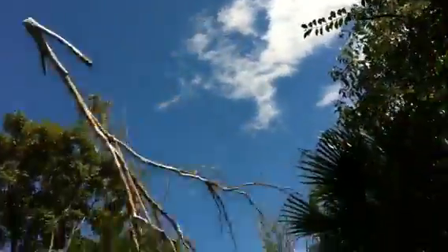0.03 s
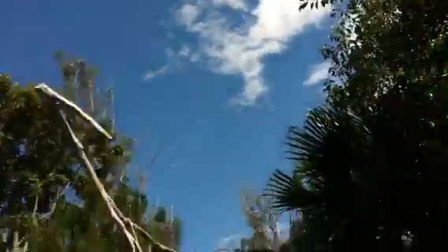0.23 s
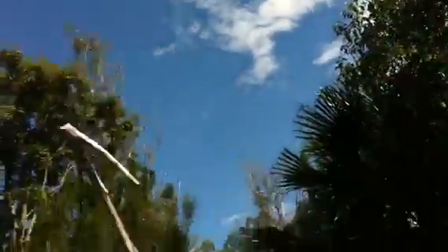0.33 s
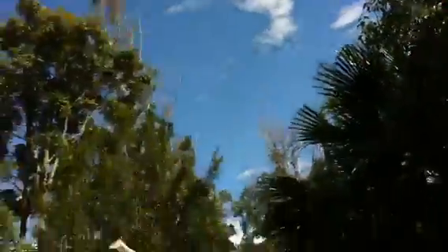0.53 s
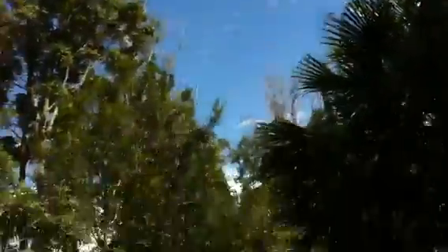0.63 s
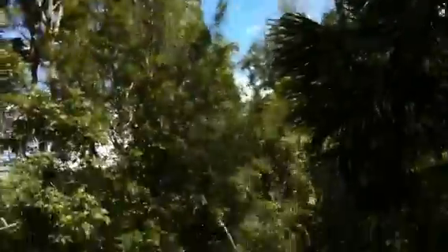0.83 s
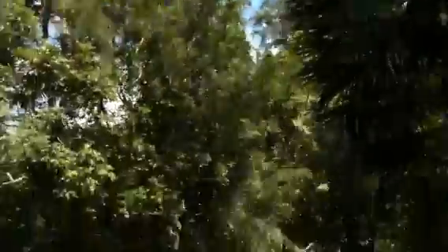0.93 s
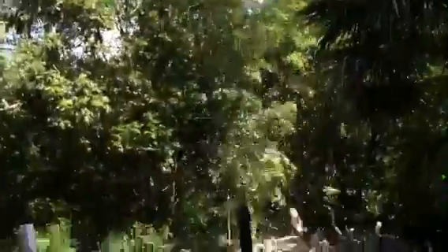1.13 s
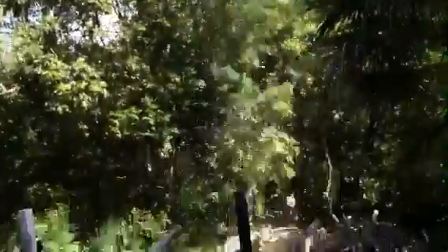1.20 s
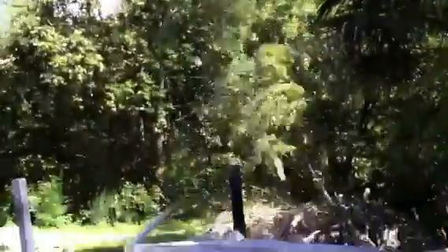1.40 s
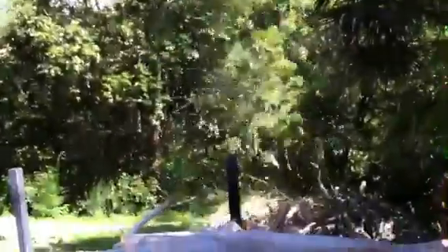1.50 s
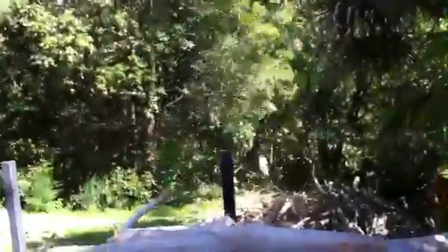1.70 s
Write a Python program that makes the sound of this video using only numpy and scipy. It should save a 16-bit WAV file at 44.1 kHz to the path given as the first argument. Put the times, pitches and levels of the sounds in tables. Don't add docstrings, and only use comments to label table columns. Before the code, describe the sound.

A dead tree falls close by in open bush: faint leaf rustle, then sharp snaps and dense crackling swell, ending in a double heavy thud and quickly settling debris, caught on a phone with slightly squeezed peaks.

```python
import sys
import numpy as np
from scipy import signal
from scipy.fft import rfft, irfft
from scipy.io import wavfile
from scipy.ndimage import uniform_filter1d

SR = 44100
rng = np.random.default_rng(int(sys.argv[2]) if len(sys.argv) > 2 else 0)


def nominal_scale(level):
    x = np.asarray(level, float) / 20
    return 10 ** x


def master_out(mix):
    frames = np.transpose(np.atleast_2d(mix))
    ceiling = np.clip(frames, -1, 1)
    pcm = np.round(ceiling * 32767).astype(np.int16)
    wavfile.write(sys.argv[1], SR, pcm)


N = 77175
BURST_N = 8192
LEAF_PER_S, LEAF_SCATTER_DB = 16000, 3
BREAK_PER_S, BREAK_SCATTER_DB = 5000, 3.5


def unit(x):
    return x / np.sqrt(np.mean(x ** 2) + 1e-20)


def band(x, hz, share):
    q = 1 / np.clip(share, .05, 1.5)
    return signal.lfilter(*signal.iirpeak(min(hz, .4 * SR), q, fs=SR), x)


def colour(x, points):
    corner_hz, corner_db = np.transpose(points)
    f = np.maximum(np.arange(1025) * SR / 2048, 1)
    shape_db = np.interp(np.log(f), np.log(corner_hz), corner_db)
    cepstrum = irfft(shape_db * np.log(10) / 20)
    cepstrum[1:1024] *= 2
    cepstrum[1025:] = 0
    response = irfft(np.exp(rfft(cepstrum)))
    return unit(signal.fftconvolve(x, response)[:len(x)])


def ticks(size, per_s, scatter_db):
    chance, side, strength = rng.random((size, 3)).T
    struck = chance < per_s / SR
    excess = np.minimum(-np.log(1 - strength), 2.2)
    return unit(struck * np.sign(side - .5) * nominal_scale(scatter_db * excess))


def walk(rate):
    k = int(SR / rate)
    w = rng.standard_normal(N)
    return unit(uniform_filter1d(uniform_filter1d(w, k), k))


def shaped(x, length, release):
    t = np.arange(BURST_N) / SR
    attack = np.minimum(t / 0.0022, 1)
    sag = nominal_scale(-2 * np.minimum(t / length, 1))
    env = attack * sag * np.exp(-np.maximum(t - length, 0) / release)
    return env * x * np.sqrt(np.sum(env ** 2) / np.sum((env * x) ** 2))


def add(out, s, x):
    i = int(s * SR)
    out[i:i + len(x)] += x[:N - i]


# (frequency [Hz], density [dB per Hz])
BUSH_SPECTRUM = [(35, -7), (110, -19), (283, -1.5), (1850, -11.5), (2820, -11.5), (3570, -8.5), (7930, -21),
                 (15300, -20), (16400, -27)]


def bush():
    return colour(rng.standard_normal(N), BUSH_SPECTRUM) * nominal_scale(-52 + 0.24 * walk(5.4))


def echo(fall):
    t60_s, start_s, level_db = 0.65, 0.01, -15.5
    t = np.arange(SR) / SR
    tail = rng.standard_normal(SR) * nominal_scale(-60 * t / t60_s) * np.clip(t / start_s, 0, 1)
    tail = signal.lfilter(*signal.butter(1, [300, 5350], "band", fs=SR), tail)
    tail = tail / np.sqrt(np.sum(tail ** 2))
    return nominal_scale(level_db) * signal.fftconvolve(fall, tail)[:N]


# (time [s], level [dB])
SOIL = [(0, -63), (.45, -56), (.7, -58), (.95, -39), (1.12, -28), (1.25, -43.5), (1.5, -54), (1.75, -56)]


def rumble():
    time, level = np.transpose(SOIL)
    x = unit(band(band(rng.standard_normal(N), 102, 1.0), 102, 1.0))
    return x * nominal_scale(np.interp(np.arange(N) / SR, time, level) + 2.3 * walk(14))


# (centre time [s], half length [s], gain change [dB])
LULLS = [(1.047, 0.0058, -1.5), (0.96, 0.0046, -3), (.812, 0.0058, -1.5), (.947, 0.0058, -3),
         (.897, 0.0034, -2), (0.75, .008, 0), (.557, .003, -2), (1.9, .015, 1), (1.51, 0.035, -3)]


def lull():
    t = np.arange(N) / SR
    return nominal_scale(sum(db * np.exp(-.5 * ((t - s) / half) ** 2) for s, half, db in LULLS))


# (time [s], level [dB], share of heavier wood [dB])
RAKE = [(0.0, -44.5, -7), (0.048, -44.5, -17), (0.062, -32, -41), (0.106, -27, -9.5), (0.184, -38.5, -15),
        (0.224, -32.5, -33), (0.268, -32.5, -8.5), (0.408, -24.5, -15.5), (0.536, -25, 0), (0.55, -25, -10),
        (0.648, -25.5, -9), (0.74, -19.5, -0.5), (0.788, -24, 4.5), (0.866, -22, 2.5), (1.038, -33.5, 5),
        (1.12, -32, 7.5), (1.276, -42.5, -0.5), (1.75, -48.5, -1.5)]
# (frequency [Hz], density [dB per Hz])
LEAVES = [(59, -35), (100, -44), (186, -2.5), (744, -5), (2210, 0), (2850, -3), (9030, 2), (15400, -5),
          (16400, -63)]
# (frequency [Hz], density [dB per Hz])
WOOD = [(35, -59), (60, -36), (237, -3), (299, -6), (815, -4), (1050, -3.5), (6790, -17.5), (9190, -21.5),
        (15700, -32)]


def crown():
    t = np.arange(N) / SR
    time, level, wood_share = np.transpose(RAKE)
    leaves = colour(ticks(N, LEAF_PER_S, LEAF_SCATTER_DB), LEAVES)
    dull = signal.lfilter(*signal.butter(2, 7200, fs=SR), leaves)
    leaves = sum(part * nominal_scale(0.6 * walk(34)) for part in (dull, leaves - dull))
    flicker_db = 2.2 * np.interp(t, (1.2, 1.4), (1, .2)) * walk(60)
    wood = colour(ticks(N, 6000, 2), WOOD) * nominal_scale(flicker_db)
    return nominal_scale(np.interp(t, time, level)) * (leaves + nominal_scale(np.interp(t, time, wood_share)) * wood)


# (time [s], length [s], level [dB], ring [Hz], splinter level
# [dB])
BRANCHES = [(0.098, 0.021, -33.5, 2620, 7), (0.21, 0.0078, -44.5, 2280, 12.5),
            (0.231, 0.014, -54.5, 2040, 18.5), (0.301, 0.029, -41, 2000, -19.5),
            (0.329, 0.0093, -30.5, 2540, -17.5), (0.369, 0.016, -25, 937, -25),
            (0.387, 0.0093, -40, 1500, 15.5), (0.47, 0.039, -27.5, 1130, -1.5),
            (0.543, 0.018, -23.5, 930, 3.5), (0.561, 0.021, -22, 920, 1.5), (0.601, 0.0051, -26, 1140, 0),
            (0.63, 0.011, -26.5, 1280, -4), (0.691, 0.013, -25, 2030, 6.5), (0.698, 0.039, -18.5, 950, -9),
            (0.73, 0.013, -19.5, 2500, 1.5), (0.76, 0.034, -36, 600, 0), (0.817, 0.031, -14.5, 777, -17),
            (0.866, 0.014, -18, 1315, -17), (0.904, 0.028, -21.5, 870, -12), (0.951, 0.022, -20.5, 800, -8),
            (.978, 0.018, -24, 570, -24), (1.056, 0.041, -26, 807, -11), (1.109, 0.04, -25.5, 780, -14),
            (1.137, 0.0093, -24.5, 1290, -28),
            (0.052, 0.015, -50, 1900, 9), (0.88, 0.025, -39, 800, -17), (1.1, 0.021, -40, 610, -12),
          (1.5, 0.016, -46, 1140, -3), (0.922, 0.012, -23.5, 660, -27), (.91, 0.042, -27.5, 480, -21),
          (.71, 0.05, -23.5, 1380, -11), (1.565, 0.046, -55, 620, -12), (.75, 0.058, -29, 445, 7),
          (.845, 0.043, -25, 404, -20), (.92, 0.035, -33.5, 3000, 3), (.82, 0.036, -19.5, 1380, -14),
          (.541, 0.016, -25, 630, -7), (.63, 0.033, -36, 414, -14),
            (1.348, .012, -43.5, 2000, 1.5), (1.1, 0.0092, -36.5, 1600, -9), (1, 0.014, -40, 1350, -12),
         (0.69, 0.0071, -34, 1600, -4), (.888, .006, -23, 1040, -2), (.77, .008, -21, 520, -12),
         (.095, .03, -36.5, 790, -10), (.371, .012, -27, 980, -25)]


def branches():
    out = np.zeros(N)
    release_s = 0.0097
    for s, length, db, hz, bright_db in BRANCHES:
        fibres = ticks(BURST_N, BREAK_PER_S, BREAK_SCATTER_DB)
        fine = ticks(BURST_N, LEAF_PER_S, LEAF_SCATTER_DB)
        ring = unit(band(band(fibres, hz, 0.28), hz, 0.7))
        overtone = unit(band(fibres, 1.99 * hz, 0.59))
        limb = shaped(ring + nominal_scale(-1.5) * overtone, length, release_s)
        splinters = shaped(band(fine, 5100, 1.26), length, release_s)
        add(out, s, nominal_scale(db) * (limb + nominal_scale(bright_db) * splinters))
    return out


# (time [s], peak level [dB], ring [Hz])
SNAPS = [(0.099, -9, 5600), (0.1105, -12, 3500), (0.563, -7.5, 1080), (0.83, -12, 1440), (1.601, -37, 500),
         (0.37, -12.5, 1000), (.378, -18.5, 1040), (0.55, -15, 1100), (.5715, -11.5, 800),
         (.602, -15.5, 1030), (.059, -31, 3000), (0.7372, -5, 2350), (.742, -11.5, 2200), (.772, -13, 740),
         (0.8239, -4.5, 960), (.838, -3.5, 730), (.891, -10, 1050), (0.914, -13, 820), (0.936, -7.5, 2600),
         (.956, -16, 790), (.982, -11, 510), (1.0624, -17, 420), (1.112, -17, 700), (1.33, -24.5, 3000),
         (1.2125, -26, 500), (1.3, -35, 370), (.483, -14.5, 1470), (.3355, -21, 2400), (.519, -18, 1080),
         (.105, -19.5, 1200), (0.13, -17, 2200), (.911, -10.5, 960), (.7005, -12, 890)]


def snaps():
    out = np.zeros(N)
    for s, db, hz in SNAPS:
        x = band(band(signal.unit_impulse(2048), hz, 0.89), hz, 0.89)
        add(out, s, nominal_scale(db) * x / np.abs(x).max())
    return out


# (time [s], length [s], level [dB], ring [Hz])
THUDS = [(.003, 0.022, -47, 259), (.065, 0.055, -46.5, 300), (0.241, 0.095, -46.5, 340),
         (.386, 0.019, -38.5, 266), (.477, 0.021, -38, 230), (.56, 0.024, -30, 300),
         (.719, 0.072, -49, 238), (.865, 0.1, -29, 236), (.976, 0.078, -26.5, 300),
         (1.057, 0.037, -23.5, 330), (1.121, 0.015, -26, 330), (1.147, 0.013, -28, 402),
         (1.165, 0.019, -39, 250), (1.185, 0.036, -34, 228), (1.258, 0.015, -41, 300),
         (1.338, 0.024, -46, 280), (1.42, 0.017, -50, 263), (1.546, 0.018, -45.5, 420),
         (1.565, 0.042, -46, 377), (1.736, .03, -51, 220)]


def thuds():
    out = np.zeros(N)
    for s, length, db, hz in THUDS:
        x = band(band(ticks(BURST_N, 1500, BREAK_SCATTER_DB), hz, 0.63), hz, 1)
        add(out, s, nominal_scale(db) * shaped(x, length, 0.0081))
    return out


# (time [s], length [s], level [dB], pitch [Hz], sag [share of pitch per s])
GROANS = [(.113, 0.036, -39.5, 231.4, 1.5), (.485, .035, -38.5, 225, 0), (.72, .015, -35, 228.5, 0),
          (.885, 0.048, -36.5, 203, 0), (1.058, 0.062, -27, 194, .5), (1.195, .025, -36, 210, -0.5),
          (1.731, .03, -42, 200, 4), (1.568, 0.017, -44.5, 324, 0), (1.58, .014, -45, 216, -1),
          (.165, 0.026, -49, 219.5, -0.5), (1.015, 0.024, -32.5, 250, 5)]


def groans():
    out = np.zeros(N)
    t = np.arange(BURST_N) / SR
    for s, length, db, hz, sag in GROANS:
        pitch = hz * (np.exp(-sag * t) + 0.015 * walk(28)[:BURST_N])
        note = np.sin(2 * np.pi * np.cumsum(pitch) / SR)
        add(out, s, nominal_scale(db) * shaped(note, length, 0.021))
    return out


# (time [s], peak level [dB])
LANDING = [
    (1.1238, -5),
    (1.1398, -1),
    (1.1535, -14),
    (1.169, -18),
]
# (frequency [Hz], level [dB], t60 [s])
BODY = [(180, -4, .12), (310, 0, .06), (430, -7, .035), (775, -12, .03), (110, -8, .1)]


def landing():
    out, t = np.zeros(N), np.arange(BURST_N) / SR
    ring = sum(nominal_scale(db - 60 * t / t60) * np.sin(2 * np.pi * hz * t) for hz, db, t60 in BODY)
    for s, db in LANDING:
        add(out, s, nominal_scale(db) * ring / np.abs(ring).max())
    return out


def scene():
    raking = lull() * (crown() + branches() + thuds() + groans())
    fall = raking + rumble() + snaps() + landing()
    return (fall + echo(fall) + bush())[None]


def band_limit(x):
    return signal.sosfilt(signal.butter(12, 16570, fs=SR, output="sos"), x)


def record(dry):
    ceiling = 1.1
    x = signal.sosfilt(signal.butter(5, 147, "high", fs=SR, output="sos"), dry)
    x = ceiling * np.tanh(x / ceiling)
    x = x + 0.083 * x ** 2
    x = signal.sosfilt(signal.ellip(12, .5, 80, 15740, fs=SR, output="sos"), x)
    x = signal.lfilter(*signal.butter(1, 25, "high", fs=SR), x)
    return band_limit(x)


dry = scene()
out = record(dry)
master_out(out)
```